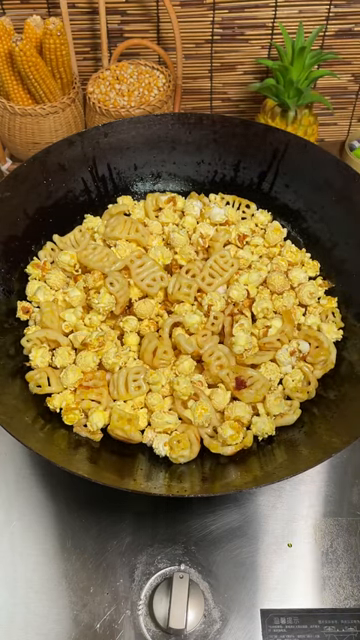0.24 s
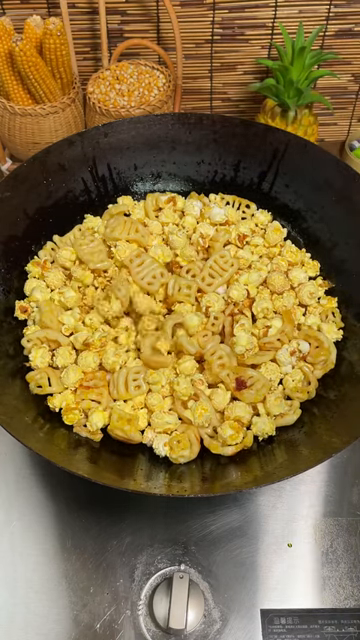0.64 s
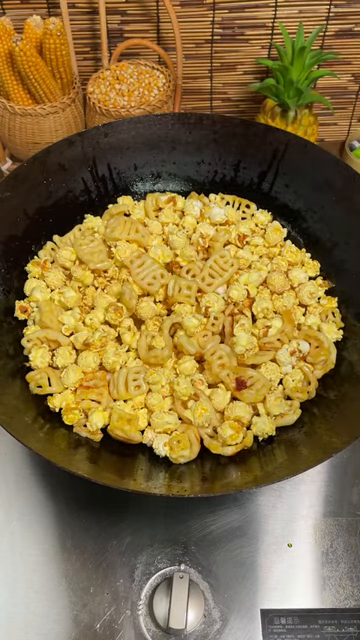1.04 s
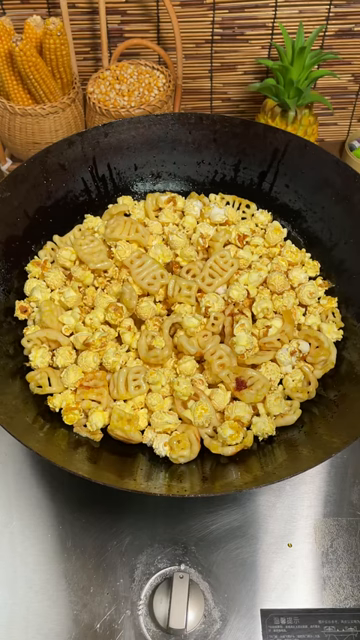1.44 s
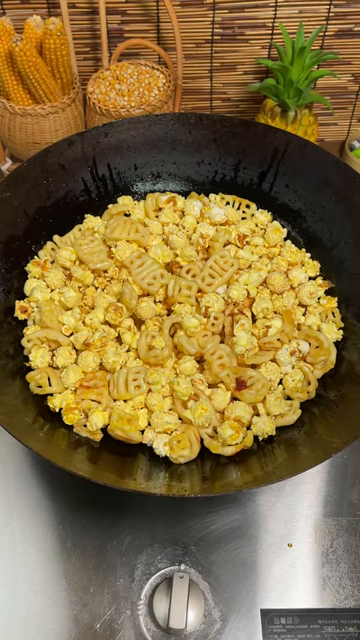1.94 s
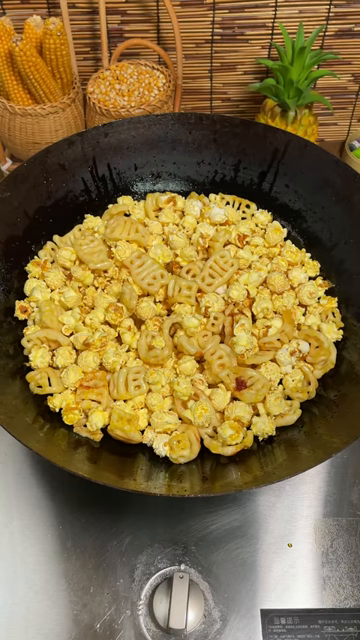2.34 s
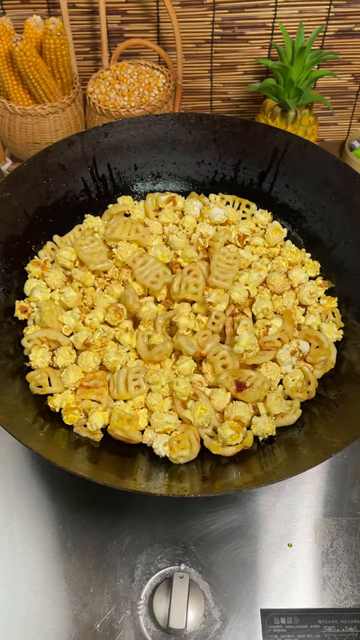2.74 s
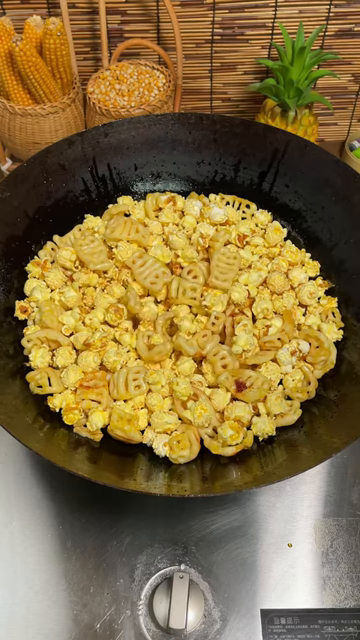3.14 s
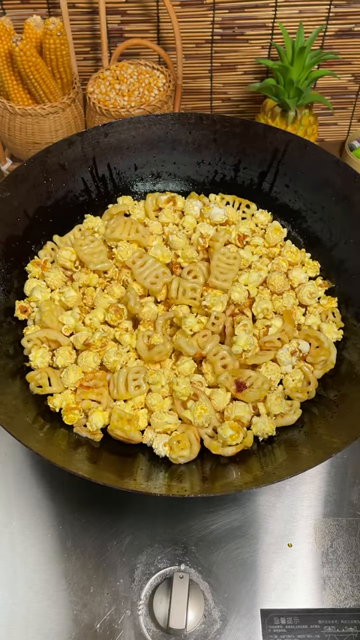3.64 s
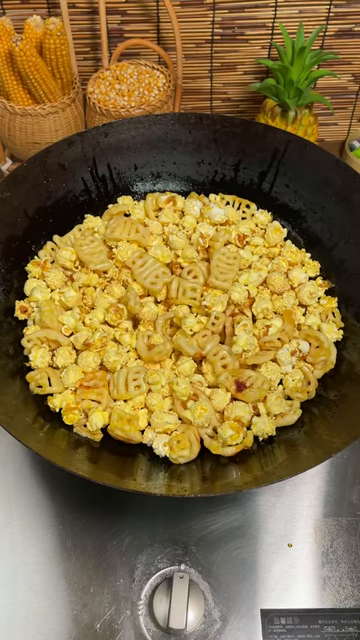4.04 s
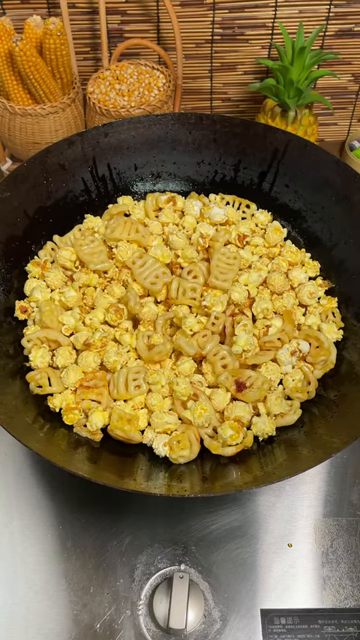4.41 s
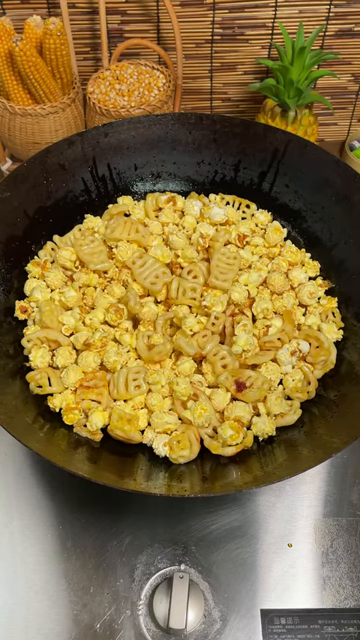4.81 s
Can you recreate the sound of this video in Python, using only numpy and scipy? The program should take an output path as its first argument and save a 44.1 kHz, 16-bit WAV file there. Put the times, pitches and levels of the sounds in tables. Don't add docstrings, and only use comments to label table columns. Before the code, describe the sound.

A close, quiet kitchen scene beside an iron wok of popped corn. Faint airy hiss, minute crackle, low room air and a soft fridge hum run throughout. Light dry ticks start at 0.1 s; at 0.6 s a kernel bursts with a hard, full, low-edged pop and short room tail. Snaps and a tiny creak follow at 0.8-0.9 s, then paired ticks around 1.1-1.2 s and a busy little group at 1.6-1.7 s. Very faint bumps stir near 1.4 and 2 s. Cracks thicken from 2.4 s, with a strong snap at 2.66 s and a second hard, more midrange pop at 2.75 s as the hiss briefly swells. From 3.2 to 3.5 s a heavy hollow object is knocked and dragged in the background, a dull resonant thump with rustle, fading by 3.7 s. Sparse clicks, one faint pop at 4.2 s and barely audible rumbling continue to 5 s.

```python
import sys
import numpy as np
from scipy import signal
from scipy.fft import rfft, irfft, next_fast_len
from scipy.io import wavfile
from scipy.ndimage import uniform_filter1d

SR = 44100
rng = np.random.default_rng(int(sys.argv[2]) if len(sys.argv) > 2 else 0)


def wav_out(sig):
    wavfile.write(sys.argv[1], SR, np.round(np.clip(np.atleast_2d(sig).T, -1, 1) * 32767).astype(np.int16))


def volts_from_decibels(level):
    exponent = np.asarray(level, float) / 20
    return 10 ** exponent


N = 223763


def evened(x):
    return x / np.sqrt(np.mean(x ** 2) + 1e-20)


def read(points, hz, axis=1):
    table = np.transpose(points)
    return np.interp(np.log(hz + 1), np.log(table[0] + 1), table[axis])


def add(mix, start_s, sound):
    part = mix[..., round(start_s * SR):][..., :sound.shape[-1]]
    part += sound[..., :part.shape[-1]]


def resonate(x, hz, width_hz):
    r = np.exp(-np.pi * abs(width_hz) / SR)
    gain = (1 - r * r) / 2
    return signal.lfilter([gain, 0, -gain], [1, -2 * r * np.cos(2 * np.pi * hz / SR), r * r], x)


def colour(x, points):
    size = next_fast_len(x.shape[-1])
    gain = volts_from_decibels(read(points, np.fft.rfftfreq(size, 1 / SR)))
    return irfft(rfft(x, size) * gain, size)[..., :x.shape[-1]]


def highpass(x, order, hz):
    return signal.sosfilt(signal.butter(order, hz, "high", fs=SR, output="sos"), x)


def patchy(patchy_db, flicker_db):
    frames = N // 128 + 5
    a, b, c, d, patches = rng.standard_normal((frames, 257, 5)).T
    patches = uniform_filter1d(patches, size=7, axis=0)
    patches = evened(uniform_filter1d(patches, size=20, axis=1))
    flicker = evened(uniform_filter1d(rng.standard_normal(frames), size=3))
    z = np.array([a + 1j * b, c + 1j * d]) * volts_from_decibels(patchy_db * patches + flicker_db * flicker)
    return signal.istft(z, nperseg=512, noverlap=384)[1][:, :N]


# (frequency [Hz], level [dB])
AIR_TONE = [(25, -35), (45, 9.5), (75, 2.5), (170, -11), (350, -8), (700, -7.5), (1200, -8.5),
            (2500, -59.5)]
# (frequency [Hz], rms [dB])
FRIDGE_HUM = [(123.8, -66.5), (215.3, -80), (247.6, -61.5), (376.8, -70)]
AIR_DB = -53.5


def kitchen():
    t = np.arange(N) / SR
    air = volts_from_decibels(AIR_DB) * evened(colour(patchy(patchy_db=-4.5, flicker_db=3.0), AIR_TONE))
    for hz, db in FRIDGE_HUM:
        waver = evened(uniform_filter1d(rng.standard_normal(N), size=6000))
        air = air + volts_from_decibels(db + 3 + 1.37 * waver) * np.sin(2 * np.pi * (hz * t + 0.13 * waver))
    return air


# (time [s], level [dB])
SIZZLE_LEVEL = [(0, -47), (.9, -50), (2.0, -47), (2.42, -45.5), (2.57, -42), (2.74, -43.5), (2.96, -48.5),
                (3.25, -47.5), (3.42, -49), (3.7, -48), (4.0, -49), (5.07, -47.5)]
# (frequency [Hz], level [dB])
SIZZLE_TONE = [(300, -4), (1000, -1), (2200, 5), (5000, 4.5), (8000, 4.5), (10000, 1.5), (12500, -6),
               (14500, 3.5), (15800, -11), (16300, -52)]
TILT_DB, TILT_GROWTH = 0, 0.65


def sizzle():
    level_db = np.interp(np.arange(N) / SR, *np.transpose(SIZZLE_LEVEL))
    hiss = evened(colour(patchy(patchy_db=1.45, flicker_db=2.5), SIZZLE_TONE))
    lift = volts_from_decibels(TILT_DB + TILT_GROWTH * (level_db + 46.5)) - 1
    return volts_from_decibels(level_db + 2) * (hiss + lift * highpass(hiss, 2, 7000))


def crackle():
    rate_hz = 90
    size = volts_from_decibels(0.5 * np.minimum(rng.exponential(1, N), 5)) * (rng.random(N) < rate_hz / SR)
    envelope = signal.oaconvolve(size, np.exp(-np.arange(120) / 18))[:N]
    return volts_from_decibels(-69.5) * evened(colour(envelope * rng.standard_normal(N), SIZZLE_TONE))


def crack(db, hz, treble_db, width_hz, noise):
    t = np.arange(len(noise)) / SR - .003
    burst = noise * (.22 * np.exp(-abs(t) / .0004) + .04 * np.exp(-abs(t) / .002))
    burst[np.argmin(abs(t))] += 1
    shell = resonate(resonate(burst, hz, 1.6 * width_hz), hz, 1.6 * width_hz)
    knock = resonate(burst, 1500, 3000)
    edge = resonate(resonate(burst, 7400, 6400), 8100, 6400)
    wide = 1.15 * np.clip(width_hz / 4000, 0, 1) ** 2
    sound = shell / abs(shell).max() + wide * knock / abs(knock).max()
    sound = sound + volts_from_decibels(treble_db + 6.0) * edge / abs(edge).max()
    return volts_from_decibels(db) * sound / abs(sound).max()


def pop(db, lag_cycles, tone, noise):
    size = 8192
    t, hz = np.arange(len(noise)) / SR, np.fft.rfftfreq(size, 1 / SR)
    burst = .14 * noise * np.exp(-abs(t - .0022) / .0009)
    burst[88] += 1
    late = 2 * np.pi * lag_cycles * np.log(1 + hz / 60) + 2 * np.pi * .004 * hz
    sound = irfft(rfft(burst, size) * volts_from_decibels(read(tone, hz)) * np.exp(-1j * late), size)
    ramp = np.arange(size)
    sound = sound * np.minimum(ramp / 200, 1) * np.minimum(ramp[::-1] / 2000, 1)
    return volts_from_decibels(db) * sound / abs(sound).max()


# (time [s], peak [dB], pitch [Hz], treble [dB])
TICKS = [(0.1118, -24.5, 3960, 0), (.347, -22, 6550, -15), (0.4394, -27, 4700, -32), (0.806, -15, 4300, -5),
         (.873, -17, 4060, -15), (1.1586, -20.5, 4800, -17), (1.2256, -20.5, 2030, -5),
         (1.619, -18.5, 3060, -10.5), (1.6647, -23.5, 6260, -18), (1.6681, -19, 4950, -21),
         (1.709, -15.5, 5860, -2), (1.732, -25, 3100, -19), (2.699, -18, 9900, -12),
         (2.7237, -16, 3660, -2), (2.7849, -13, 3200, -27), (3.1396, -21.5, 2980, -8.5),
         (3.197, -17.5, 2950, -1.5), (3.993, -18.5, 4400, -39), (4.2157, -21.5, 7000, -13),
         (4.515, -23, 5560, -12), (4.8832, -15.5, 5950, -27)]
# (time [s], peak [dB], pitch [Hz], treble [dB])
BURIED = [(.1604, -28, 5100, -18), (0.1776, -17.5, 4940, -11.5), (0.2629, -26, 3160, -25),
          (.375, -27, 4610, -4), (1.094, -25, 1910, -31), (1.0976, -20, 3020, -13), (1.998, -22, 3130, -6),
          (2.0002, -28, 4960, -3), (2.3872, -16, 4580, -11), (2.4094, -36, 5810, -18),
          (2.4413, -10.5, 3440, -5), (2.6544, -20.5, 3300, -26), (2.6587, -3, 3000, -46),
          (2.7417, -16, 2350, 16), (1.098, -37, 2600, -10), (2.772, -47, 8400, -18),
          (3.014, -34, 5060, -15), (3.227, -27, 2200, -18), (3.7496, -21, 2420, -5.5),
          (4.146, -31.5, 3020, -14), (4.276, -30.5, 3200, 11), (4.4507, -22.5, 3120, -11),
          (4.5429, -28, 2400, -16), (4.5446, -24, 3580, -17), (4.8315, -22, 3070, -10),
          (4.8345, -26.5, 3960, -9)]
# (time [s], peak [dB], pitch [Hz], width [Hz])
CREAKS = [
    (.8608, -25, 4350, 1050),
    (.8622, -24.5, 2340, 950),
    (0.863, -19, 4590, 510),
    (0.865, -18, 4570, 810),
    (.8675, -20.5, 4840, 450),
    (2.748, -18, 2240, 2080),
]
# (time [s], peak [dB], pitch lag [cycles], room share [dB])
POPS = [
    (0.6133, -2, 1.316, -8),
    (2.7506, -2, 1.203, -7.5),
    (4.2136, -23.5, 1.5, -34),
]
# (frequency [Hz], level [dB])
POP_TONES = [
    [(60, -1), (120, 7), (200, 2.5), (420, 11.5), (620, 5.5), (1000, -3), (1500, -1.5), (2300, 1.5),
     (3000, -6), (4000, 0.5), (5000, -7), (6200, -4), (9200, -14), (10500, -25)],
    [(60, -30), (120, -13), (250, -8), (500, -2), (800, -11), (1400, -7), (2300, 4), (3200, -9),
     (4000, -26), (5500, -30), (7000, -24), (9200, -36), (12000, -32), (16000, -38)],
]
CRACK_WIDTH_HZ, CREAK_TREBLE_DB = 3210, -43
TOP_ROOM_DB, BURIED_ROOM_DB, CREAK_ROOM_DB = -20, -10, -9.5


def kernels():
    out = np.zeros((2, N))
    cracks = [(s, db, hz, CREAK_TREBLE_DB, width_hz, CREAK_ROOM_DB) for s, db, hz, width_hz in CREAKS]
    cracks += [(*row, CRACK_WIDTH_HZ, TOP_ROOM_DB) for row in TICKS]
    cracks += [(*row, CRACK_WIDTH_HZ, BURIED_ROOM_DB) for row in BURIED]
    noises = rng.standard_normal((len(POPS) + len(cracks), 900))
    for (s, db, lag_cycles, room_db), tone, noise in zip(POPS, 2 * POP_TONES, noises):
        add(out, s - .006, pop(db, lag_cycles, tone, noise) * volts_from_decibels([[0], [room_db]]))
    for (s, db, hz, treble_db, width_hz, room_db), noise in zip(cracks, noises[len(POPS):]):
        add(out, s - .0024, crack(db, hz, treble_db, width_hz, noise) * volts_from_decibels([[0], [room_db]]))
    return out


# (frequency [Hz], t60 [s])
ROOM_T60 = [(80, 0.81), (300, 0.42), (1000, 0.48), (3000, 0.37), (6000, 0.53), (12000, 0.084)]


def room(x):
    taps = np.zeros((2, SR // 2))
    at = np.arange(200, SR // 2 - 10, 10)
    at = at + rng.integers(0, 10, (2, len(at)))
    np.put_along_axis(taps, at, rng.choice([-1., 1.], at.shape), 1)
    hz, t, z = signal.stft(taps, SR, nperseg=256)
    decay = volts_from_decibels(-60 * t / read(ROOM_T60, hz)[:, None])
    tail = signal.istft(z * decay, SR, nperseg=256)[1]
    return signal.fftconvolve(x[None], tail / np.linalg.norm(tail[0]), axes=1)[:, :N]


# (time of full force [s], effort [dB], rise [s], weight on floor [dB], grit underfoot [dB])
SHOVES = [(1.313, -60.5, 0.0091, -19, 7), (1.36, -47.5, .015, 0.5, 3), (1.399, -62, 0.016, 3, 7),
          (1.893, -56.5, 0.065, 5, 2.5), (1.96, -48.5, 0.034, -2, -6), (2.012, -57, .03, -9, 3),
          (2.166, -51, .02, -14, 1.5), (3.242, -29, 0.012, -26, -1.5), (3.266, -25, 0.015, -4.5, -2.5),
          (3.328, -20, 0.019, -9.5, -5), (3.356, -18.5, 0.036, -3.5, -4.5), (3.38, -27.5, 0.045, 3.5, 2.5),
          (3.405, -14.5, 0.036, -32, -6), (3.442, -20, 0.024, -15.5, -20), (3.493, -37, 0.024, 1.5, -2),
          (3.625, -42, 0.09, 2, 2.5), (4.407, -54.5, 0.046, 11.5, 4.5), (4.47, -54, 0.026, 13, -4.5),
          (4.546, -53.5, 0.037, -5, 3), (4.673, -50, 0.088, 1.5, -3.5), (4.994, -63.5, 0.06, 21, 4),
          (5.034, -69.5, 0.041, 12, 11.5)]
LET_GO_DB_PER_S = 242
LINGER_DB, LINGER_DB_PER_S = -7, 96
SCUFF_DB, SCUFF_GROWTH = -5.5, 0.57
GRIT_FADE_DB_PER_S = 169


def effort():
    out = np.zeros((3, N))
    for s, db, rise_s, weight_db, grit_db in SHOVES:
        rise_s = max(rise_s, .003)
        t = np.arange(-rise_s, .6, 1 / SR)
        after = np.maximum(t, 0)
        swell = np.clip(1 + t / rise_s, 0, 1) ** 2
        push = swell * np.maximum(volts_from_decibels(-LET_GO_DB_PER_S * after), volts_from_decibels(LINGER_DB - LINGER_DB_PER_S * after))
        rustle_db = SCUFF_DB - 21 + SCUFF_GROWTH * (db + 19.5) + grit_db - GRIT_FADE_DB_PER_S * after
        shove = np.array([push * volts_from_decibels(db), push * volts_from_decibels(db + weight_db), swell * volts_from_decibels(rustle_db)])
        add(out, s - rise_s, shove ** 2)
    return np.sqrt(out)


def ring(knocks, modes):
    body = sum(volts_from_decibels(db) / np.sqrt(width_hz) * resonate(knocks, hz, width_hz) for hz, width_hz, db in modes)
    return body / np.sqrt(uniform_filter1d((body ** 2).mean(0), size=3500) + 1e-12)


# (frequency [Hz], width [Hz], level [dB])
BODY = [(169, 10, -36), (288.6, 15, 6.5), (370, 30, 5), (410, 11, 6), (478.4, 25, 4.5), (661, 22, -4),
        (750, 25, -28), (908, 9.4, -11.5), (1015.4, 8, -7.5), (1310, 62, -7.5)]
# (frequency [Hz], width [Hz], level [dB])
BOARDS = [(85.8, 13.3, 3.5), (129, 16, -5)]
# (frequency [Hz], level [dB])
SCUFF_TONE = [(700, 1.5), (1500, -4.5), (2300, 6.5), (4000, -1), (7000, -8.5), (9000, -35), (12000, -35),
              (16000, -51)]


def bump():
    force, load, rustle = effort()
    rate_hz = 480
    knocks = volts_from_decibels(1.2 * rng.exponential(1, (2, N))) * (rng.random((2, N)) < rate_hz / SR)
    knocks = resonate(knocks * rng.choice([-1., 1.], knocks.shape), 520, 1300)
    boards = load * ring(resonate(knocks, 100, 72), BOARDS)
    scuff = rustle * evened(colour(rng.standard_normal(knocks.shape), SCUFF_TONE))
    return force * ring(knocks, BODY) + boards + scuff


# (frequency [Hz], room [rad], wok [rad], side [rad])
PORTS = [(30, 0.05, .05, 0.04), (259, 0.31, 0.092, 0.17), (727, 1.6, 0.2, 1.52), (1827, 0.11, 0.11, 1.1),
         (2590, 1.32, .7, 1.25), (4750, 1.2, 0.83, 1.3), (4960, 0.55, .2, 0.46), (6154, 1.725, 1.4, 1.2),
         (7010, 2.59, 2.3, 2.004), (8384, 4.15, 3.78, 3.4), (9610, 4.64, 5.34, 2.4), (11350, 6.2, 4.6, 6.3),
         (13750, 8.65, 10, 8.6), (15460, 7.7, 11.3, 8.3)]


def ports(pair, axis, locked):
    size = next_fast_len(N)
    half = read(PORTS, np.fft.rfftfreq(size, 1 / SR), axis=axis) / 2
    a, b = rfft(pair, size)
    locked = np.clip(locked, 0, 1)
    mid = np.cos(half) * a
    side = np.sin(half) * (1j * locked * a + np.sqrt(1 - locked ** 2) * b)
    return irfft(np.array([mid + side, mid - side]), size)[:, :N]


def scene():
    direct, sent = kernels()
    direct = direct + crackle()
    diffuse = room(sent) + sizzle() + kitchen()
    bumps = highpass(bump(), 4, 62)
    wok = ports(np.array([direct, direct]), axis=2, locked=1)
    return wok + ports(diffuse, axis=1, locked=.4) + ports(bumps, axis=3, locked=.2)


def low_pass(x):
    return signal.sosfilt(signal.butter(12, 17140, fs=SR, output="sos"), x)


def record(dry):
    return low_pass(highpass(dry, 2, 35))


dry = scene()
out = record(dry)
wav_out(out)
```